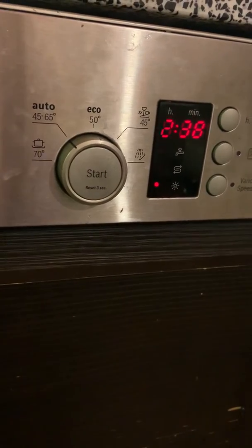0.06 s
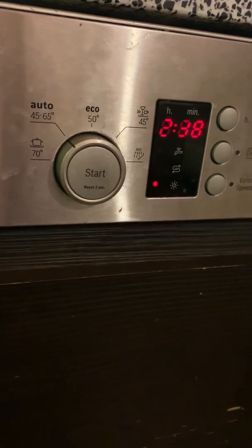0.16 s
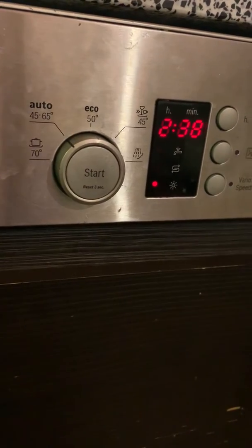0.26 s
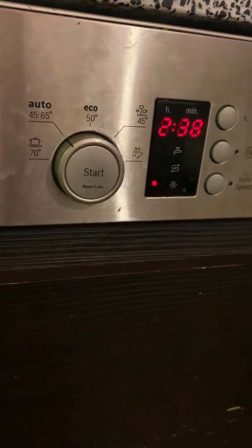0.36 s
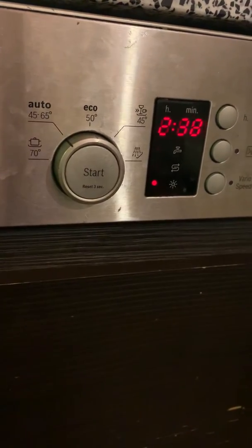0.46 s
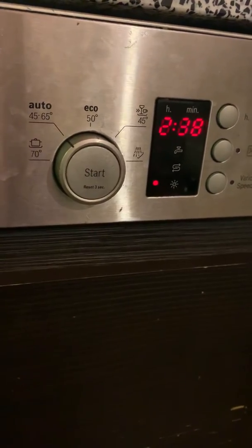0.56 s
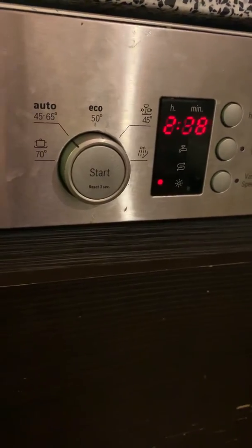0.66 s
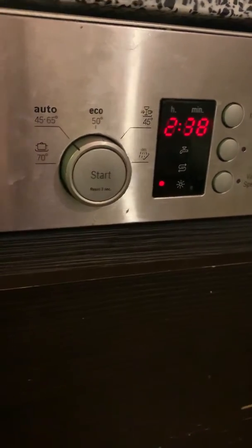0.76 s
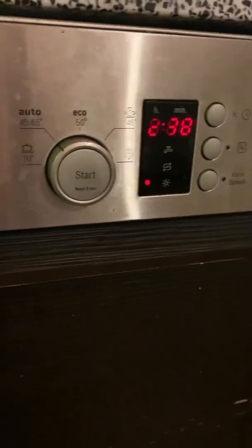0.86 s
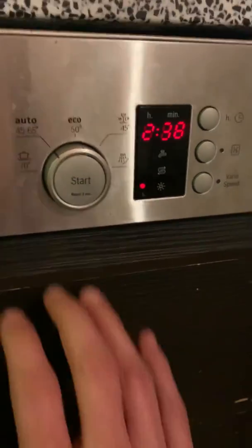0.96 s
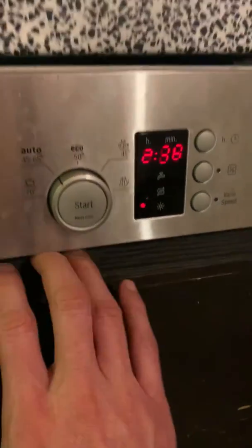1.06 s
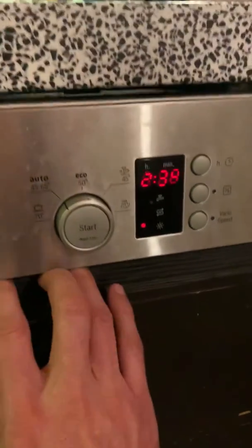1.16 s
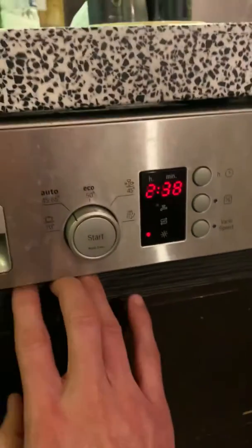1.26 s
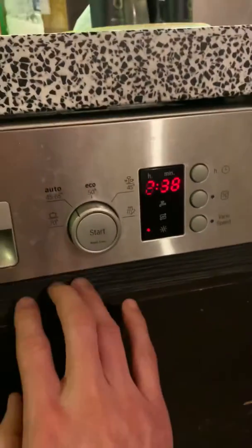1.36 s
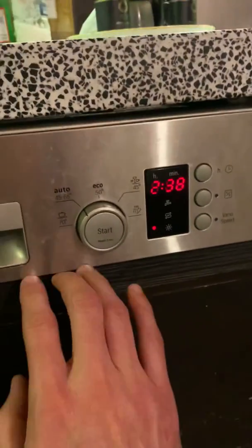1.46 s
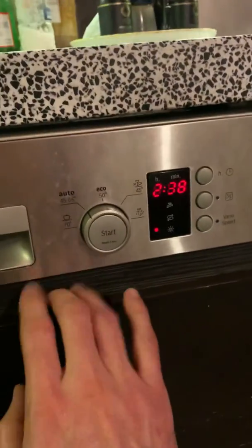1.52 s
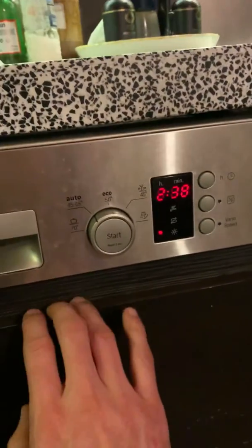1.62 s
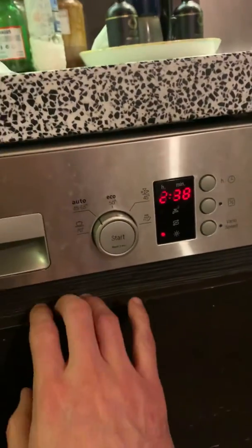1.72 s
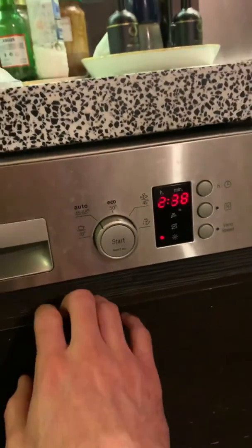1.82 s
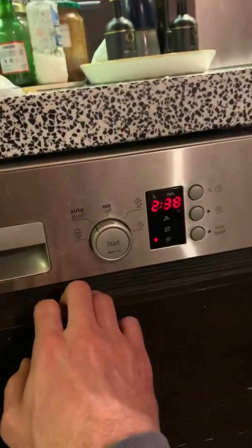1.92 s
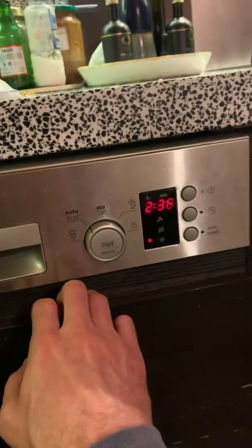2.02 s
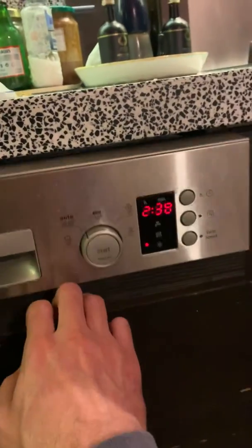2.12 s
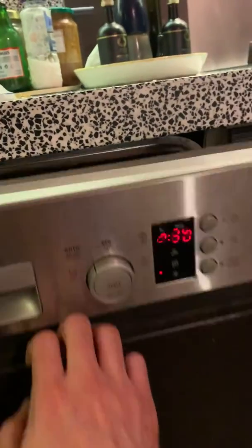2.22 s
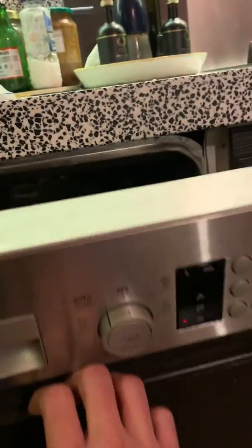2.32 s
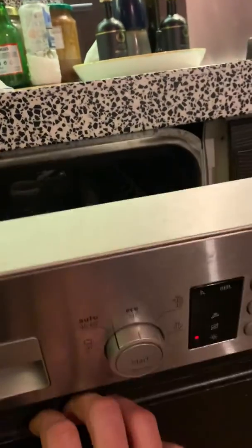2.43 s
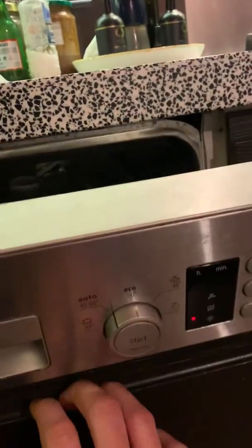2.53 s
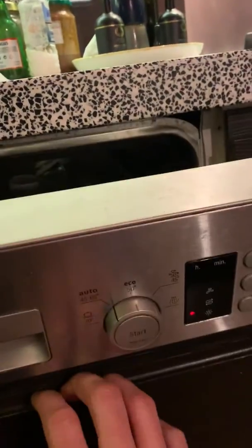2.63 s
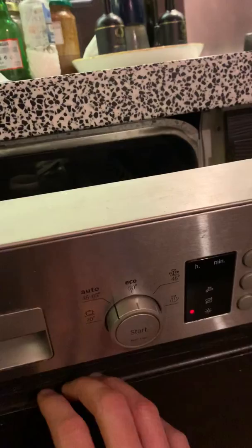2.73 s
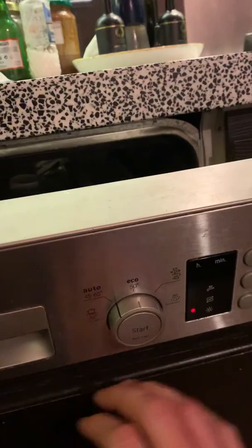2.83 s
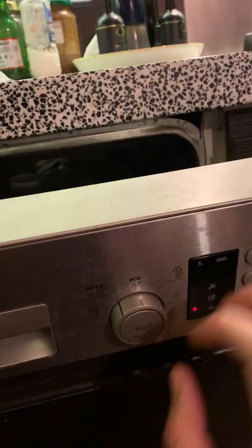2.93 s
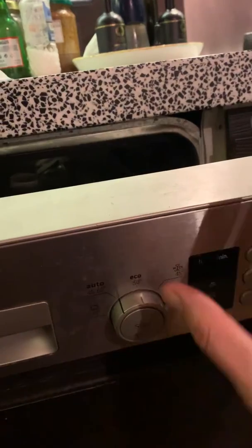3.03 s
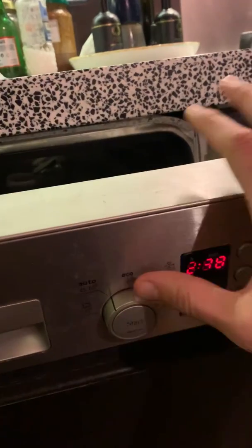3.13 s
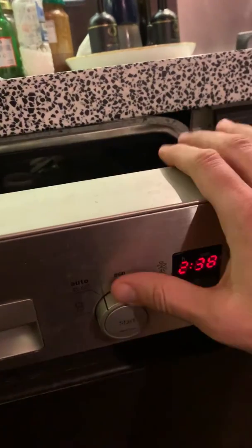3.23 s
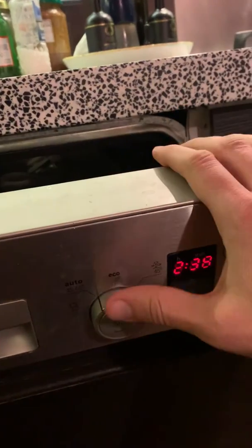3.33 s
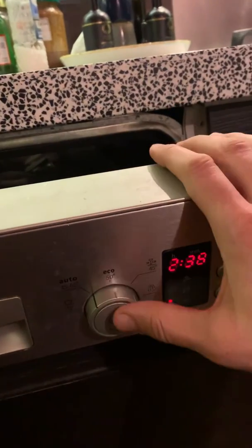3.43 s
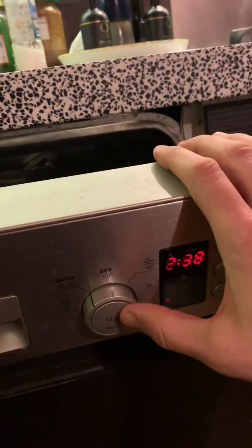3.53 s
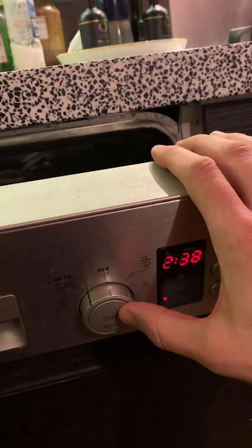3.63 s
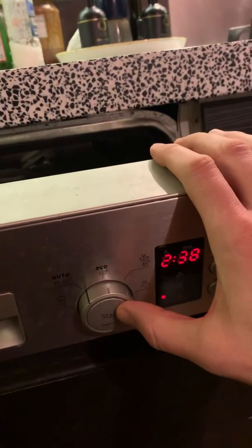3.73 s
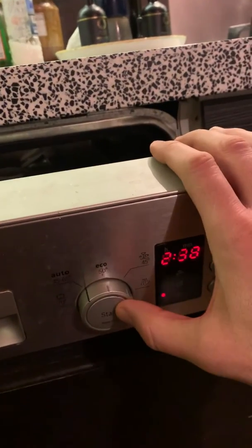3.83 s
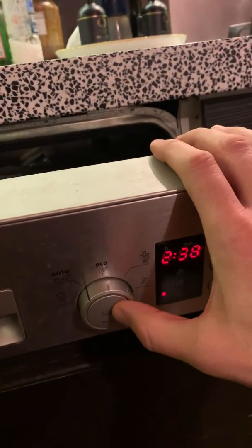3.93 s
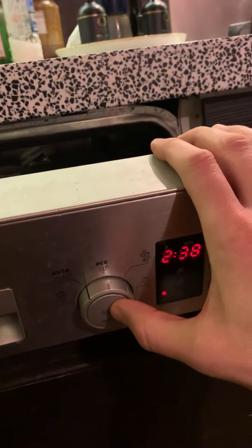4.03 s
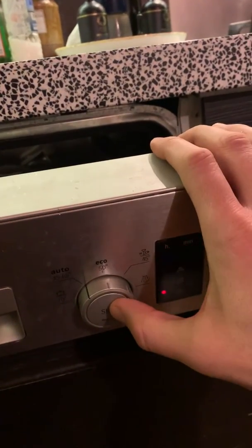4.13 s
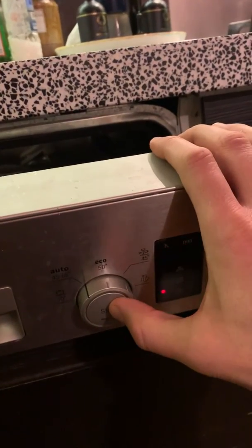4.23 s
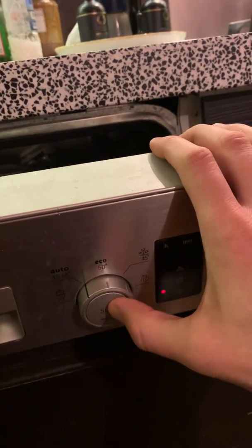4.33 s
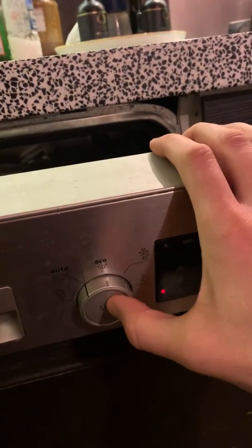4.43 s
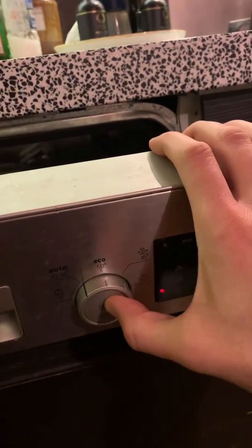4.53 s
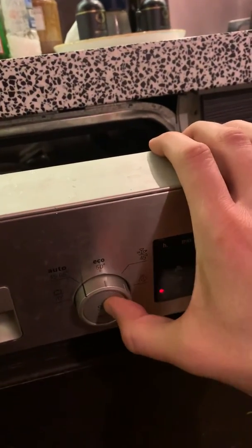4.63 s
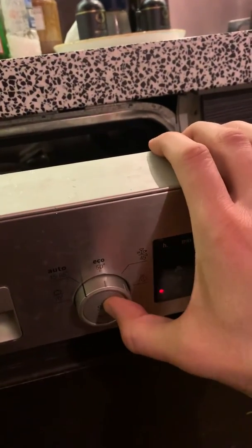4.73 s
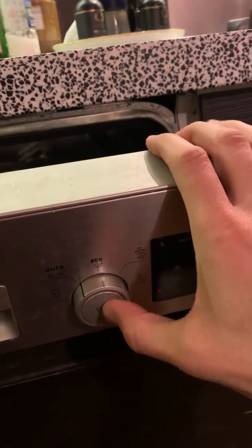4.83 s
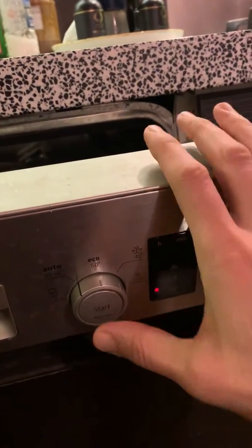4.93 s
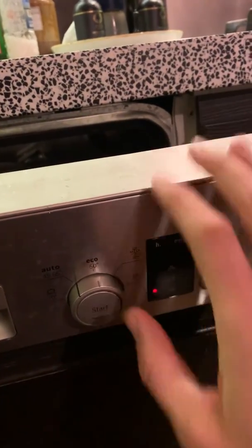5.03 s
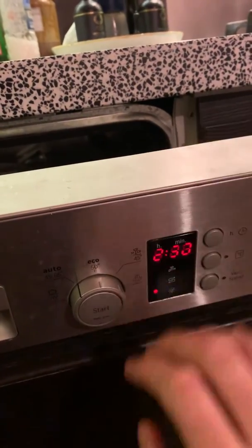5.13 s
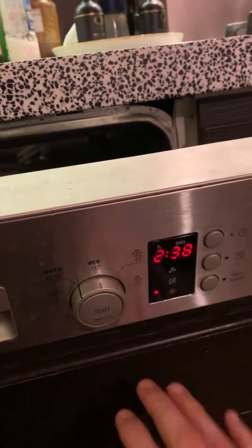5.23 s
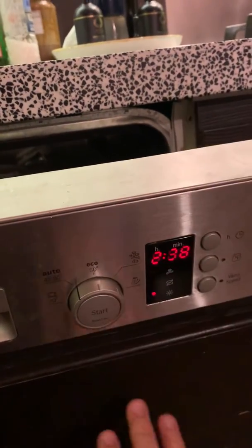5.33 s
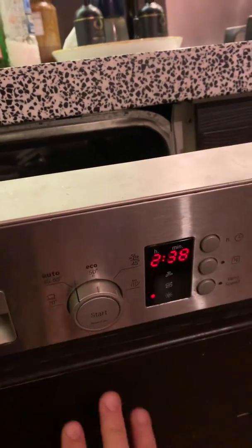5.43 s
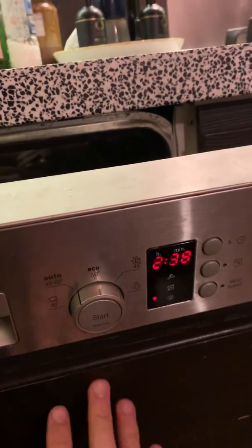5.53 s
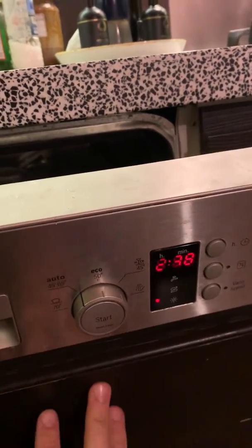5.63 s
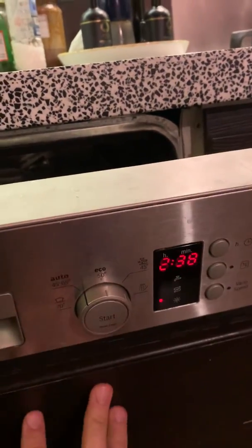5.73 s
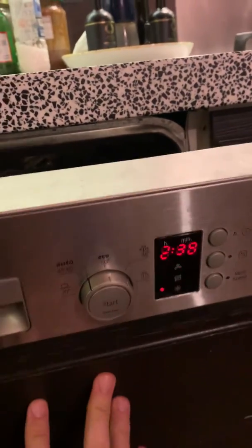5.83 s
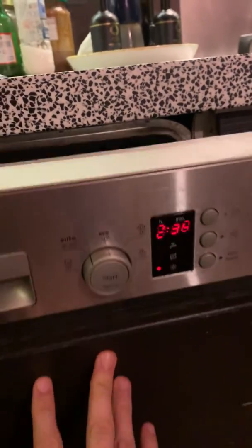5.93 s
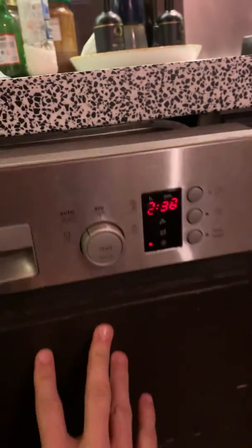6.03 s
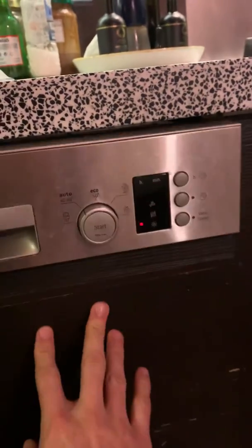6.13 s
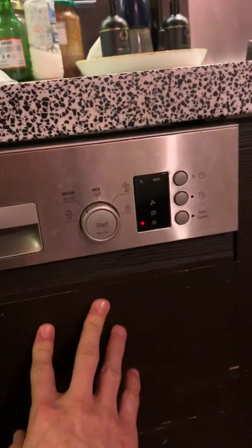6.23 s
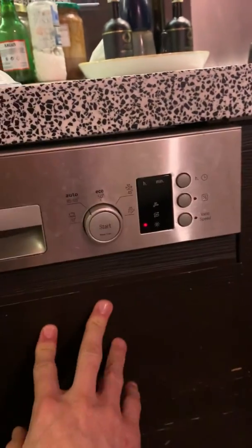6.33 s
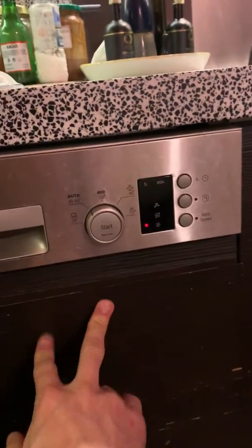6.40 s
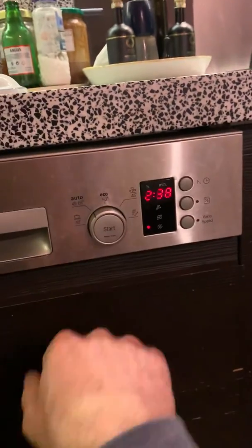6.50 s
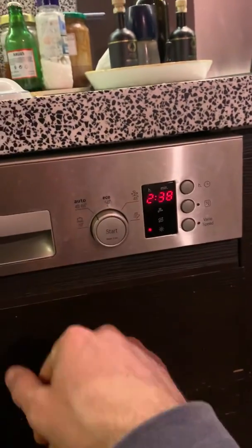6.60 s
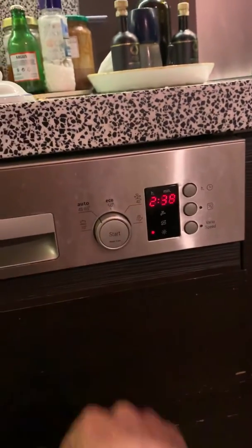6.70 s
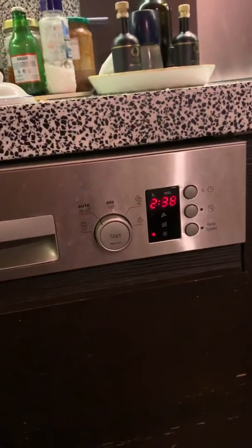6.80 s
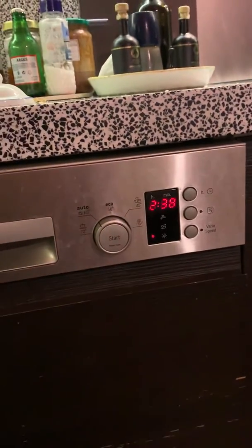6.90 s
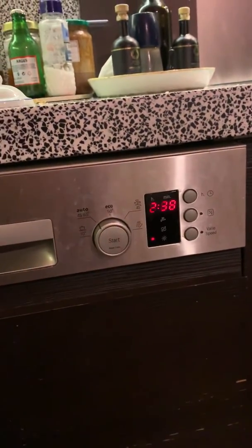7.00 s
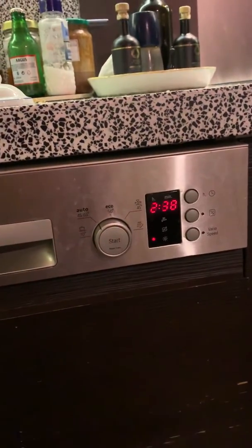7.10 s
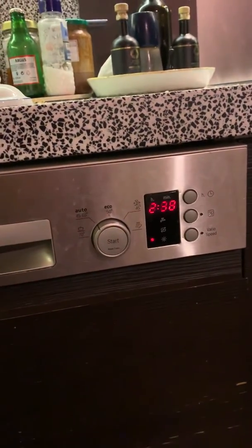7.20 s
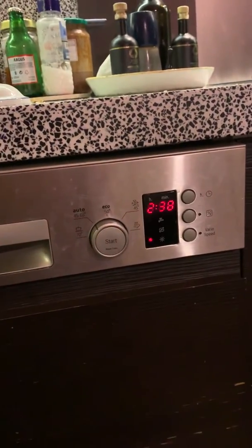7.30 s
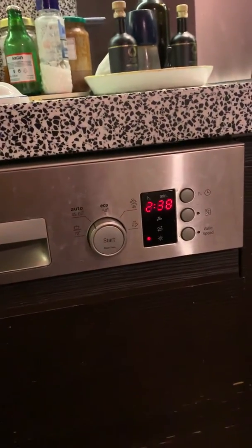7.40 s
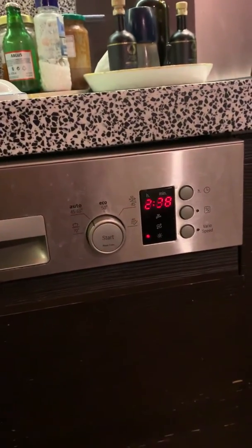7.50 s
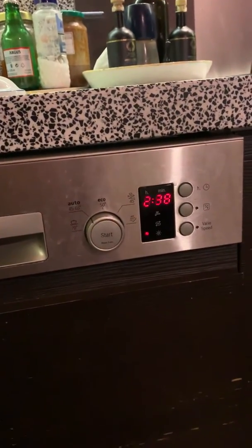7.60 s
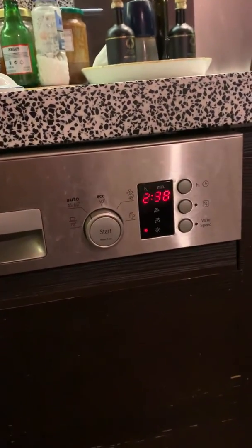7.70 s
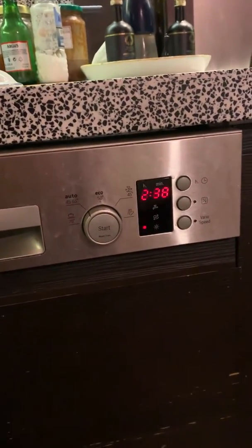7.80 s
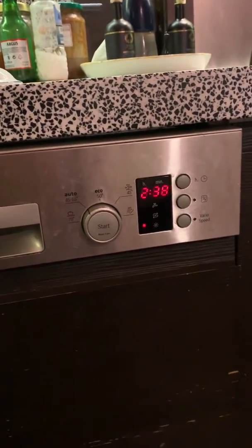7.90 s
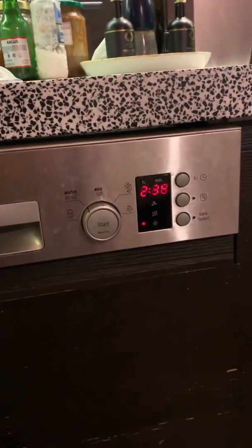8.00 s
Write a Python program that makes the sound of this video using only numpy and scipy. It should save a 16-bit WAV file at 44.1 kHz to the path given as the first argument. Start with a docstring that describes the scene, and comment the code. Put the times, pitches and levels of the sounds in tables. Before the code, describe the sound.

A low dishwasher hum cuts out, followed by latch clicks, knocks, a button press, a loud door slam and another clunk in a small kitchen.

```python
"""A dishwasher's motor hums in harmonics of its shaft speed, then stops. A hand pulls the door open (the
latch clicks, the hinge spring rings by stick-slip), presses the start knob and slams the door; a second
clunk follows and the machine rattles inside. Each impact excites damped modes: soft contacts the low
ones, hard contacts the high ones too. A small hard kitchen reverberates around a hand-held two-port
microphone, and skin and sleeve rub close by."""
import sys
import numpy as np
from scipy import signal
from scipy.fft import rfft, irfft, next_fast_len
from scipy.io import wavfile

SR = 44100
rng = np.random.default_rng(int(sys.argv[2]) if len(sys.argv) > 2 else 0)


def unload_audio(sound):
    """Save the sound as a 16-bit wav file, at the path given as the first command line argument."""
    columns = np.transpose(np.atleast_2d(sound))
    # keep every value between -1 and 1, then stretch to whole-number steps
    steps = np.round(np.clip(columns, -1, 1) * 32767)
    wavfile.write(sys.argv[1], SR, steps.astype(np.int16))


N = 355093


def from_db(db):
    """Decibels to amplitude ratio."""
    return 10 ** (np.asarray(db) / 20)


def rms_one(x):
    """Normalise to rms 1."""
    return x / np.sqrt(np.mean(x ** 2) + 1e-20)


def peak_one(x):
    """Normalise each row to peak 1."""
    return x / np.abs(x).max(axis=-1, keepdims=True)


def in_time(rows):
    """Linear interpolation of each column at every sample."""
    s, *columns = np.transpose(rows)
    return [np.interp(np.arange(N) / SR, s, c) for c in columns]


def at_hz(points, hz):
    """Interpolation on a logarithmic frequency axis."""
    known_hz, values = np.transpose(points)
    return np.interp(np.log(hz), np.log(known_hz), values)


def band(x, low_hz, high_hz, order=2):
    """Butterworth band-pass."""
    sos = signal.butter(order, [low_hz, min(high_hz, .45 * SR)], "band", fs=SR, output="sos")
    return signal.sosfilt(sos, x)


def split(x, hz):
    """Crossover: the parts below and above hz."""
    return [signal.sosfilt(signal.butter(4, hz, kind, fs=SR, output="sos"), x) for kind in ("low", "high")]


def drift(rate_hz):
    """Low-pass noise: a slow random fluctuation of rms about 1."""
    r = np.exp(-80 * np.pi * rate_hz / SR)
    slow = signal.lfilter([1], [1, -2 * r, r * r], rng.standard_normal(N // 40 + 2002))[2000:]
    return np.interp(np.arange(N) / 40, np.arange(len(slow)), rms_one(slow))


def decay(t, t60):
    """Exponential damping: 60 dB down after t60."""
    return np.exp(-np.log(1000) * t / t60)


def add(out, sound, s):
    """Superpose a short sound at time s."""
    i = round(s * SR)
    out[:, i:i + len(sound)] += sound[:N - i]


# likeness of the two ports: (frequency [Hz], correlation [ratio])
COHERENCE = [(60, 0.99), (340, .8), (700, 0.071), (1100, 0.5), (1700, 0.067), (2800, 0.1), (4800, 0.55),
             (9000, 1), (15000, 0.39)]
HALF_OCTAVES_HZ = 25 * 2 ** np.arange(0, 9.6, .5)

def at_ports(mid, side, hz, coherence_shift=0):
    """Partial coherence: two independent noises mix into a correlated left and right."""
    alike = np.clip(at_hz(COHERENCE, hz) + coherence_shift, -1, 1)
    return np.sqrt(1 + alike) * mid + np.sqrt(1 - alike) * side * [[1], [-1]]


def stereo_noise(spectrum, flicker_db, coherence_shift):
    """Random amplitude modulation: half-octave noise bands flicker, partly together; rms 1."""
    out, together = np.zeros((2, N)), drift(5.8)
    white = rng.standard_normal((2, 2, N))
    for k, (low, high) in enumerate(zip(HALF_OCTAVES_HZ, HALF_OCTAVES_HZ[1:])):
        hz = np.sqrt(low * high)
        if high < spectrum[0][0] or at_hz(spectrum, hz) < -55:
            continue
        mid, side = band(white[k % 2], low, high)
        gain = from_db(at_hz(spectrum, hz) + flicker_db * (together + drift(31)))
        out += gain * at_ports(mid, side, hz, coherence_shift)
    return rms_one(out)


# envelope of the motor: (time [s], level [dB])
MOTOR_LEVEL = [(0.0, -48.5), (0.364, -49), (0.404, -55), (0.43, -68), (0.495, -79)]
# harmonics of the hum: (order [multiple of shaft speed], relative level [dB])
MOTOR_ORDERS = [(1, -7), (2, 3), (3, -7.5), (4, -15.5), (5, -7.5), (6, -1.5), (7, -14), (8, -8), (9, -15),
                (10, -39), (11, -20), (12, -26), (13, -20), (14, -42)]
# spectral envelope of the high orders: (frequency [Hz], relative level [dB])
BUZZ_SPECTRUM = [(350, -44), (600, -9), (756, -1.5), (2150, -5.5), (3410, -17.5), (3830, -11.5),
                 (4150, -19), (5000, -28), (6500, -58), (11000, -120)]
# tones of the drive electronics: (frequency [Hz], rms level [dB])
WHINE_TONES = [(9787, -105), (10266, -99)]
TURNS_PER_S, SWITCH_OFF_S, SLOWING_TURNS_PER_S2 = 40.2, .36, 64
HUM_WAVER_DB, BUZZ_DB, BUZZ_ROUGHNESS, WHINE_END_S = 2, -28, .3, 0.35

def motor():
    """Rotation radiates harmonics of the shaft speed, which glide down together after switch-off."""
    t = np.arange(SR // 2) / SR
    lost_turns = SLOWING_TURNS_PER_S2 / 2 * np.maximum(t - SWITCH_OFF_S, 0) ** 2
    angle = 2 * np.pi * (TURNS_PER_S * t - lost_turns)
    hum = sum(from_db(db) * np.sin(k * angle + rng.uniform(0, 2 * np.pi)) for k, db in MOTOR_ORDERS)
    orders = np.arange(15, 110)
    strengths = from_db(at_hz(BUZZ_SPECTRUM, orders * TURNS_PER_S) + 3.4 * rng.standard_normal(len(orders)))
    buzz = strengths @ np.sin(orders[:, None] * angle + rng.uniform(0, 2 * np.pi, (len(orders), 1)))
    buzz *= 1 + BUZZ_ROUGHNESS * rms_one(band(rng.standard_normal(len(t)), 23, 240))  # loose parts blur it
    level_db = in_time(MOTOR_LEVEL)[0] + HUM_WAVER_DB * drift(13)
    running = from_db(level_db[:len(t)]) * (t < MOTOR_LEVEL[-1][0])
    whine = sum(np.sqrt(2) * from_db(db) * np.sin(2 * np.pi * hz * t) for hz, db in WHINE_TONES)
    out = np.zeros((2, N))
    add(out, running * (rms_one(hum) + from_db(BUZZ_DB) * rms_one(buzz)) + whine * (t < WHINE_END_S), 0)
    return out


# background of the room: (frequency [Hz], relative spectral density [dB])
ROOM_SPECTRUM = [(15, -43), (25, -7), (92, 2.5), (330, -5), (399, -9.5), (445, -13.5), (669, -31),
                 (1010, -19), (1390, -31), (1640, -32.5), (5270, -31), (9080, -29.5), (16500, -34.5)]
# slow changes of its treble: (time [s], gain [dB])
HISS_GAIN = [(0, 3), (0.45, -6.5), (1.4, 1.5), (2.1, 2), (5.5, 2), (8.05, 4)]
ROOM_DB, HISS_FROM_HZ = -74, 950

def room_noise():
    """Broadband ambient noise: a steady low murmur under a faint hiss."""
    murmur, hiss = split(stereo_noise(ROOM_SPECTRUM, flicker_db=.6, coherence_shift=-.4), HISS_FROM_HZ)
    return from_db(ROOM_DB) * (murmur + from_db(in_time(HISS_GAIN)[0]) * hiss)


# the door in motion: (time [s], rumble level [dB], creak level [dB])
DOOR_MOTION = [(0.45, -65.5, -102), (0.85, -79, -92.5), (1.76, -56.5, -78), (2.08, -61, -50.5),
               (2.48, -60.5, -69.5), (2.65, -45.5, -61), (2.9, -63.5, -60), (4.7, -59, -71.5),
               (5.42, -68.5, -74), (5.99, -60, -54), (6.27, -53.5, -48), (6.4, -43, -45),
               (6.69, -57.5, -68.5), (6.97, -51, -76.5), (7.12, -49, -57.5), (7.31, -59.5, -71.5),
               (7.62, -60, -62), (8.05, -60.5, -72)]
# its two noises: (frequency [Hz], relative spectral density [dB])
RUMBLE_SPECTRUM = [(15, -43), (25, -17), (70, -3), (107, -7), (134, -12.5), (205, -13), (284, -29),
                   (500, -40), (650, -55), (1100, -120)]
CREAK_SPECTRUM = [(150, -33), (250, 9.5), (640, -5), (782, -6.5), (1310, -11), (2480, -19), (3430, -33.5),
                  (5000, -32.5), (6500, -60.5), (11000, -120)]
RUMBLE_RE_THUMP_DB, CREAK_RE_CLICK_DB = -24, -28.5

def door_motion():
    """Structure-borne noise: the door rumbles and creaks as it is moved and after each blow."""
    rumble_db, creak_db = in_time(DOOR_MOTION)
    thump_db, click_db = np.array(BLOWS)[:, 1:3].T
    fade_in = np.clip(np.arange(N) / SR / DOOR_MOTION[0][0], 0, 1) ** 20
    rumble_gain = fade_in * from_db(rumble_db) + shudder(thump_db + RUMBLE_RE_THUMP_DB)
    creak_gain = fade_in * from_db(creak_db) + shudder(click_db + CREAK_RE_CLICK_DB)
    rumble = stereo_noise(RUMBLE_SPECTRUM, flicker_db=4.0, coherence_shift=0.029)
    creak = stereo_noise(CREAK_SPECTRUM, flicker_db=3.0, coherence_shift=0.054)
    return rumble_gain * rumble + creak_gain * creak


# strokes of skin and sleeve, and a last soft hiss from the tub at 7.7 s: (start [s], level [dB], hold [s], rise
# [s], gain of the dull part [dB])
RUBS = [(0.567, -91, 0.032, 0.034, 5), (0.75, -89, 0.027, 0.02, -9), (0.863, -88, 0.02, 0.017, -1),
        (1.02, -77, 0.067, 0.029, 6), (1.244, -75, 0.067, 0.028, -1), (1.555, -72, 0.015, 0.0087, -12),
        (1.616, -64.5, 0.035, 0.038, -3), (1.915, -79, 0.034, 0.026, 10), (2.37, -61.5, 0.0082, 0.013, -7),
        (2.488, -78, 0.019, 0.018, 14), (2.663, -64, 0.057, 0.015, 4.5), (2.718, -53, 0.058, 0.017, -25),
        (2.799, -74, 0.016, 0.024, -2), (3.034, -70.5, 0.017, 0.015, 12), (3.106, -58.5, 0.012, 0.018, 0),
        (3.126, -78.5, 0.051, 0.043, 9), (3.288, -65, 0.13, 0.11, -3), (3.552, -62.5, 0.012, .015, 7.5),
        (3.811, -82, 0.035, 0.016, 14.5), (4.376, -66, 0.011, 0.012, -3), (4.39, -78, 0.043, 0.036, 16),
        (4.743, -67.5, 0.033, 0.047, 13), (6.432, -63.5, 0.018, 0.024, 12.5), (6.616, -77, .03, 0.025, 6),
        (6.931, -65.5, 0.075, 0.043, -2), (7.469, -68.5, 0.02, .02, -3), (7.696, -81, 0.17, 0.15, 2)]
# their friction noise: (frequency [Hz], relative spectral density [dB])
RUB_SPECTRUM = [(1200, -33), (2000, 9), (4000, -8.5), (5500, -5), (7400, 3), (9000, -4.5), (11000, -6),
                (15500, -3), (17000, -10)]
DULL_BELOW_HZ = 5100

def rubs():
    """Sliding friction makes noise that rises, holds, and fades in twice its rise time."""
    t = np.arange(N) / SR
    strokes = np.array([from_db(db) * np.interp(t, np.cumsum((s, rise, hold, 2 * rise)), (0, 1, 1, 0)) ** 2
                        for s, db, hold, rise, _ in RUBS])
    dull, bright = split(stereo_noise(RUB_SPECTRUM, flicker_db=3.0, coherence_shift=0.073), DULL_BELOW_HZ)
    dull_gains = from_db(np.array(RUBS)[:, 4])
    return dull_gains @ strokes * dull + strokes.sum(axis=0) * bright


def contact_force(length_s, per_s):
    """Rough contact: one blow or slide is a train of small random impulses."""
    t = np.arange(2400) / SR
    hits = (rng.random(len(t)) < per_s / SR) * rng.standard_normal(len(t))
    hits[0] = 0.21 + 2.93 * np.exp(-length_s / 0.0079)  # long contacts start softly
    progress = t / max(length_s, .0005)
    return hits * np.where(progress < 1, .5 + 2 * progress * (1 - progress), 0)


def struck(modes, t, spread_db, count):
    """Modal superposition: one row of damped sines a strike, with random strengths and signs."""
    hz, level_db, t60 = np.transpose(modes)[:, :, None]
    chance = rng.standard_normal((count, 2, len(modes)))
    strengths = from_db(level_db.T + spread_db * chance[:, 0]) * np.sign(chance[:, 1])
    return strengths @ (np.sin(2 * np.pi * hz * t) * decay(t, t60))


# the door's boom, panel, clack, latch and tick: middle frequency, and how readily each rings
PART_HZ, PART_DB = np.array([200, 550, 1500, 3300, 8000]), (-1.5, 2.5, 2, -0.5, 2)
THUMP_DB_PER_OCT, CLICK_BELOW_DB_PER_OCT, CLICK_ABOVE_DB_PER_OCT = 9, 6, 15

def part_gains(thump_db, click_db, click_octaves):
    """Excitation spectrum: the thump falls off above the boom, the click on both sides of its pitch."""
    octaves = np.log2(PART_HZ / 1000)
    offset = octaves - click_octaves[:, None]
    click_loss_db = np.where(offset > 0, CLICK_ABOVE_DB_PER_OCT, CLICK_BELOW_DB_PER_OCT) * np.abs(offset)
    thump = from_db(thump_db[:, None] - THUMP_DB_PER_OCT * (octaves - octaves[0]))
    click = from_db(click_db[:, None] - click_loss_db)
    return from_db(PART_DB) * np.hypot(thump, click)


# knocks and clicks: (time [s], thump level [dB], click level [dB], click pitch [octaves above 1 kHz],
# contact time [s], reverberation send [dB])
BLOWS = [(0.916, -80, -58.5, -2, 0.0018, -15), (1.045, -47.5, -58, 1.3, 0.017, 0),
         (1.229, -80, -57, 4, 0.0016, -14), (1.238, -56.5, -59, 1, 0.011, -2),
         (1.419, -66, -57, 1.4, 0.002, 2), (1.46, -46, -51.5, 2.5, 0.0023, -8),
         (1.522, -39.5, -51, 3, 0.0044, -26), (1.552, -68, -56, 3.5, 0.003, -2),
         (1.732, -47, -45.5, 2.5, 0.008, -3.5), (1.774, -43, -28.5, 7, 0.0044, -10),
         (1.825, -33.5, -35.5, 0, 0.0028, -15.5), (1.832, -48, -38.5, 3, 0.0025, -8.5),
         (1.956, -74, -57, 1.5, .003, -9), (1.968, -54, -52, 2, .0022, 3.5),
         (1.996, -60, -52, 3.5, .002, -16), (2.011, -46, -45.5, 1.8, 0.0026, -30),
         (2.029, -54, -54, 1.5, 0.0017, -14), (2.066, -47, -51, 1.5, 0.0083, -3),
         (2.092, -28.5, -31.5, 2.5, 0.0047, -3), (2.381, -69, -47.5, 3, 0.004, -14),
         (2.395, -65, -52, 3, 0.002, -16), (2.476, -50.5, -57.5, 2, 0.0012, 8.5),
         (2.524, -46, -49.5, 1.15, 0.028, -6.5), (2.676, -45, -39, 4.5, 0.001, -23),
         (2.73, -55, -38, 3, .001, -20), (2.757, -55, -42, 4, 0.019, -7),
         (3.051, -48.5, -53, 1.2, 0.022, 6), (3.117, -58, -39, 3.5, 0.0022, -7),
         (3.24, -75, -59, 1.5, 0.024, -12), (3.45, -41, -58, 1, 0.02, -7.5),
         (3.562, -58, -42.5, 3, 0.005, -11), (3.703, -49.5, -52, 1, 0.038, -4.5),
         (3.851, -50, -57, 1, 0.038, -1), (3.99, -53, -56, 0.5, 0.025, -23),
         (4.324, -61, -59, 0, 0.0097, -2), (4.361, -50.5, -45, 0.44, 0.003, -3.5),
         (4.386, -44, -50, 5, 0.027, -14), (4.412, -47, -45.5, .6, 0.0016, -11),
         (4.422, -48, -39.5, 0.5, 0.0048, -17), (4.438, -39, -38.5, 2.5, 0.003, -17),
         (4.444, -42.5, -42, 1, 0.005, -22), (4.722, -85, -51.5, 3, 0.0024, -9),
         (4.745, -77, -73, -1, .003, -5), (4.771, -48, -33.5, 4.5, 0.001, -5),
         (4.789, -41.5, -32.5, 2.5, 0.005, -16), (4.816, -33, -31.5, 1.1, 0.002, -7.5),
         (4.912, -45.5, -44.5, 1.54, .0017, -26), (4.951, -65, -44.5, 1.3, 0.0029, -39),
         (4.984, -70, -56, -0.5, 0.0049, -20.5), (5.534, -45, -51, -11, 0.016, 0.5),
         (5.725, -90, -53, 2, 0.0036, -8), (5.893, -68, -56, 1.5, 0.00094, 2),
         (5.911, -46, -37.5, 2, 0.0022, -11), (6.059, -37, -39.5, 4.5, 0.003, 9.5),
         (6.081, -24, -26, 0.25, 0.005, 2), (6.128, -43, -29.5, 0.6, 0.014, 6),
         (6.143, -18, -14.5, 1.86, 0.005, -7.5), (6.149, -17.5, -6, 3, .002, -7),
         (6.152, -12.5, -6.5, 2.27, 0.0016, -4.5), (6.158, -19.5, -15.5, 0.8, 0.0022, -4.5),
         (6.163, -22.5, -17, 2.7, 0.004, -4), (6.478, -63.5, -45.5, 3, .001, -12.5),
         (6.465, -38.5, -41, 1.06, 0.021, -4), (6.637, -48, -42.5, 4, .0046, -11),
         (6.925, -48, -63.5, 2.5, 0.0018, -10), (6.939, -49, -49, 1.5, 0.024, 1),
         (6.961, -46, -36, 3, 0.004, -10.5), (6.966, -33, -17.5, 0.6, 0.00116, -5),
         (6.985, -37.5, -32, 0.9, .003, -10.5), (6.996, -40, -30.5, -0.3, .003, -6),
         (7.022, -49, -37, -1, .003, -7.5), (7.152, -39.5, -49.5, 2, .0017, -10)]
# modes of the door's five parts: (frequency [Hz], relative level [dB], t60 [s])
BOOM_MODES = [(151.6, -2, 0.17), (236.8, -9, 0.075), (262.3, 0.5, 0.089)]
PANEL_MODES = [(323.8, 2, 0.09), (414, 3.5, 0.15), (510, -2, 0.12), (670, -5.5, 0.044), (770, -11, 0.08),
               (906, -2.5, 0.077)]
CLACK_MODES = [(1044.6, -1.5, 0.045), (1300, -1.5, 0.034), (1420, -4.5, 0.059), (1495, -2.5, .045),
               (1752, 1.5, 0.043), (2100, -9.5, 0.018)]
LATCH_MODES = [(2804, 2.5, .022), (2715, 0.5, 0.041), (3280, -1.5, .025), (3596, -5, 0.025),
               (3940, -1, 0.053), (4400, 0.5, 0.068)]
TICK_MODES = [(6800, 0, .006), (8200, -2, .005), (10000, 0, .005), (11300, -3, .004), (14500, -8, .004)]
# each part's unresolved modes, as decaying noise, and its snap of first contact:
# (low edge [Hz], high edge [Hz], level [dB], t60 [s], snap level [dB])
DENSE_MODES = [(120, 300, -12, .08, -5), (300, 1000, -6, .07, 0), (1000, 2200, -4, .035, 2),
               (2200, 5000, 1, .02, 4), (5000, 13000, 2, .011, 5)]

def blows():
    """Impact: contact force convolved with each part's impulse response; gives direct sound and send."""
    t, rows = np.arange(SR // 6) / SR, np.array(BLOWS)
    forces = np.array([contact_force(contact_s, per_s=800) for contact_s in rows[:, 4]])
    gains = part_gains(*rows[:, 1:4].T)
    sounds, pulses = 0, 0
    for k, modes in enumerate((BOOM_MODES, PANEL_MODES, CLACK_MODES, LATCH_MODES, TICK_MODES)):
        low_hz, high_hz, dense_db, t60, snap_db = DENSE_MODES[k]
        rings = struck(modes, t, spread_db=2.0, count=len(rows))
        dense = band(rng.standard_normal((len(rows), len(t))) * decay(t, t60), low_hz, high_hz, order=3)
        snap = band(1.0 * (t == 0), low_hz, high_hz)
        response = peak_one(rings) + from_db(dense_db) * peak_one(dense) + from_db(snap_db) * peak_one(snap)
        driven = signal.fftconvolve(response, forces, axes=1)[:, :len(t)]
        part = gains[:, k, None] * peak_one(band(driven, .7 * low_hz, 1.3 * high_hz))
        sounds += part
        # over all directions the modes even out: the walls get a smooth pulse of the same energy
        pulses += snap * np.sqrt(np.sum(part ** 2, axis=1, keepdims=True) / np.sum(snap ** 2))
    direct, send = np.zeros((2, N)), np.zeros((2, N))
    for sound, pulse, (s, *_, send_db) in zip(sounds, pulses, BLOWS):
        add(direct, sound, s)
        add(send, from_db(send_db) * pulse, s)
    return direct, send


def shudder(levels_db, rise_s=0.011, t60=0.71):
    """Energy summation: an envelope that swells after every blow and dies away."""
    t, energy = np.arange(SR) / SR, np.zeros(N)
    energy[(np.array(BLOWS)[:, 0] * SR).astype(int)] = from_db(levels_db) ** 2
    swell = (1 - np.exp(-t / rise_s)) * decay(t, t60)
    return np.sqrt(np.abs(signal.fftconvolve(energy, swell ** 2)[:N]))


JANGLE_PER_S, JANGLE_RE_CLICK_DB = 900, -38

def jangle():
    """Secondary impacts: racks and crockery jangle after a blow, each contact ringing one mode."""
    modes = CLACK_MODES + LATCH_MODES
    hits = (rng.random(N) < JANGLE_PER_S / SR) * rng.standard_normal(N)
    mode_hit = rng.integers(0, len(modes), N)
    out = 0
    for k, (hz, db, t60) in enumerate(modes):
        r, w = decay(1 / SR, t60), 2 * np.pi * hz / SR
        force = hits * (mode_hit == k) + 1e-18
        out += from_db(db) * signal.lfilter([0, np.sin(w)], [1, -2 * r * np.cos(w), r * r], force)
    return rms_one(out) * shudder(np.array(BLOWS)[:, 2] + JANGLE_RE_CLICK_DB)


# hollow bumps on the panel: (time [s], peak level [dB], push time [s])
BUMPS = [(0.938, -60, 0.01), (2.092, -32.5, 0.0033), (2.794, -45.5, 0.022), (2.821, -34.5, 0.0077),
         (3.02, -39, 0.035), (3.034, -34, 0.046), (3.075, -42, 0.036), (6.149, -19, 0.0042)]
BUMP_BAND_HZ = (462, 786)

def bumps():
    """Band-limited excitation: a soft, uneven push rings the panel's modes without a click."""
    out, t = np.zeros((2, N)), np.arange(SR // 4) / SR
    for s, peak_db, push_s in BUMPS:
        rings = struck(PANEL_MODES, t, spread_db=1.0, count=1)[0] * decay(t, 0.082)
        hollow = peak_one(rings) + 0.57 * rng.standard_normal(len(t)) * decay(t, 0.15)
        pushed = signal.fftconvolve(hollow, contact_force(push_s, per_s=700))[:len(t)]
        add(out, from_db(peak_db) * peak_one(band(pushed, *BUMP_BAND_HZ, order=3)), s)
    return out


# small parts that ring when touched: (time [s], level [dB], frequency [Hz], t60 [s])
PINGS = [(1.054, -63, 1700, 0.072), (1.239, -65, 1520, 0.068), (1.42, -60, 1500, .012),
         (1.461, -48, 1270, 0.027), (1.523, -49.5, 1250, 0.023), (1.46, -59, 3970, .005),
         (1.524, -52, 4200, .006), (1.524, -50, 6700, 0.011), (1.528, -41, 245, 0.12),
         (1.784, -60, 8500, 0.007), (1.826, -47, 900, .012), (1.776, -49, 298, .08),
         (1.826, -39, 301, 0.076), (1.833, -48, 4350, .006), (1.956, -58, 1560, .05),
         (2.095, -30, 425, 0.044), (2.243, -35, 4600, 0.038), (2.381, -61, 7200, 0.014),
         (2.525, -58, 1796, 0.11), (2.525, -60, 2650, 0.17), (2.729, -46, 2550, 0.0046),
         (2.73, -46, 4400, 0.0045), (2.822, -39, 486, .06), (2.822, -44.5, 728, 0.24),
         (3.04, -54, 810, 0.17), (3.245, -60, 1650, .06), (3.245, -65, 2980, .05), (3.448, -61, 1650, .06),
         (3.563, -50, 2590, 0.06), (3.706, -56, 2560, 0.075), (3.705, -60, 3100, .07),
         (3.706, -64, 1900, 0.054), (3.83, -74, 7020, .15), (3.118, -49, 7000, 0.044),
         (3.118, -51, 9200, 0.022), (3.12, -52, 2600, 0.038), (4.361, -46, 1500, .012),
         (4.423, -42, 1700, .02), (4.386, -62, 8300, 0.0073), (4.393, -58, 8800, .01),
         (4.437, -36.5, 7300, 0.0048), (4.437, -36, 2100, .005), (4.771, -36.5, 6600, 0.0069),
         (4.771, -39, 4500, 0.0066), (4.783, -48, 3000, 0.0065), (4.789, -29.5, 6350, 0.012),
         (4.789, -32, 7400, 0.013), (4.789, -28, 1800, 0.0042), (4.789, -48, 4500, .004),
         (4.817, -41, 8200, .007), (4.818, -33, 1600, 0.0086), (4.819, -35.5, 4350, 0.012),
         (4.819, -32.5, 930, 0.025), (4.82, -45, 401, 0.26), (4.919, -53.5, 1314, 0.1),
         (4.952, -53, 1287, 0.076), (4.985, -61.5, 1308, 0.071), (5.911, -46, 2000, 0.011),
         (6.059, -42, 1656, 0.094), (6.082, -31, 952, 0.084), (6.149, -18, 414, 0.073),
         (6.15, -17.5, 510, 0.042), (6.15, -26.5, 670, 0.16), (6.151, -19.5, 1495, 0.036),
         (6.15, -21, 1752, 0.05), (6.151, -25, 916, 0.065), (6.151, -25, 1066, .06),
         (6.15, -15, 3406, 0.056), (6.149, -8.5, 10740, 0.0097), (6.155, -18.5, 262, 0.11),
         (6.967, -33.5, 1400, 0.11), (6.968, -32.5, 1250, 0.086), (6.968, -34, 1830, .07),
         (6.966, -23.5, 990, 0.045), (6.966, -27.5, 2800, 0.02), (6.966, -39.5, 820, 0.18)]
PING_RISE_CYCLES = .3

def pings():
    """Damped free vibration: a short touch sets a single mode ringing."""
    out, t = np.zeros((2, N)), np.arange(SR // 5) / SR
    for s, db, hz, t60 in PINGS:
        envelope = (1 - np.exp(-t * hz / PING_RISE_CYCLES)) * decay(t, t60)
        add(out, from_db(db) * envelope * np.sin(2 * np.pi * hz * t), s)
    return out


# soft pushes on the whole door: (time [s], peak level [dB], frequency [Hz], t60 [s])
THUDS = [(1.057, -40.5, 67.7, 0.33), (1.52, -50.5, 118.6, 0.41), (1.814, -54, 92, .38),
         (2.096, -29.5, 64.2, 0.21), (2.11, -41.5, 150.6, 0.35), (2.499, -45, 54.3, 0.45),
         (2.621, -44, 110.1, 1), (3.065, -48, 77, 0.28), (3.493, -35.5, 67.3, 0.26),
         (4.823, -44.5, 75, 0.43), (5.549, -51, 50, 0.35), (6.146, -22.5, 83.3, 0.27),
         (6.164, -28.5, 50.7, 0.24), (6.17, -28, 151.5, 0.38), (6.562, -46, 46.2, 0.44),
         (6.472, -40, 71.3, 1), (6.796, -56, 74, 0.4), (6.916, -45, 119, 0.25), (6.969, -29.5, 105.6, 0.36),
         (6.972, -32.5, 156, 0.24), (6.975, -35.5, 56.3, 0.35), (7.147, -40, 63.1, 0.48),
         (7.5, -53, 149.2, .6)]
PUSH_RISE_S = 0.0129

def thuds():
    """Flexural vibration: a soft push bends the door skin in one low mode."""
    out, t = np.zeros((2, N)), np.arange(SR // 2) / SR
    for s, peak_db, hz, t60 in THUDS:
        envelope = peak_one((1 - np.exp(-t / PUSH_RISE_S)) * decay(t, t60))
        add(out, from_db(peak_db) * envelope * np.sin(2 * np.pi * hz * t), s - PUSH_RISE_S)
    return out


# slides of the hinge spring: (time [s], level [dB], slide time [s])
SPRING_SLIDES = [(2.15, -48, 0.088), (2.186, -40, 0.055), (2.242, -34, 0.052), (6.079, -40, 0.12)]
# its modes: (frequency [Hz], relative level [dB], t60 [s])
SPRING_MODES = [(1410, -2, .05), (2395, 0, .04), (3380, -3, .04), (4606, 2, .05), (6100, -1, .06),
                (6830, -1, .07), (7480, -3, .06), (7750, -5, .06), (8500, -3, .07), (9464, -3, .07),
                (10050, -5, .06), (10900, -10, .06), (11500, -10, .06)]

def hinge_spring():
    """Stick-slip friction: many small slips scrape the spring and keep its modes ringing."""
    out, t = np.zeros((2, N)), np.arange(SR // 4) / SR
    for s, db, slide_s in SPRING_SLIDES:
        slips = contact_force(slide_s, per_s=2000)
        slips *= decay(t[:len(slips)], 3.3 * slide_s)
        slips[0] = 3.4  # the opening pluck
        scrape = band(rng.standard_normal(len(t)), 470, 5200) * decay(t, 0.29)
        response = struck(SPRING_MODES, t, spread_db=2.5, count=1)[0]
        rings = signal.fftconvolve(response, slips)[:len(t)]
        add(out, from_db(db) * (peak_one(rings) + 0.66 * scrape), s)
    return out


# spurts of the rattle: (time [s], low ring level [dB], tinkle level [dB], hold [s])
SPURTS = [(7.178, -57.5, -43.5, 0.015), (7.19, -43, -62, 0.018), (7.218, -54, -76, 0.079),
          (7.438, -73, -57.5, 0.0092), (7.481, -52.5, -53, 0.022), (7.509, -54, -63, .04),
          (7.552, -54, -57, 0.027), (7.61, -58.5, -64, 0.069), (7.705, -57, -63.5, 0.065),
          (7.78, -59, -59, 0.074), (7.859, -70.5, -63.5, 0.082), (7.955, -73.5, -68, .08)]

def spurts(t, rise_s=0.0012, t60=0.12):
    """Incoherent addition: overlapping spurts sum in power; gives the gains of low ring and tinkle."""
    shapes = [np.clip((t - s) / rise_s, 0, 1) * decay(np.maximum(t - s - hold, 0), t60)
              for s, *_, hold in SPURTS]
    powers = from_db(np.array(SPURTS)[:, 1:3].T) ** 2
    return np.sqrt(powers @ np.square(shapes))


# resonances of racks and tub walls: (frequency [Hz], bandwidth [Hz], relative spectral density [dB])
TUB_RESONANCES = [(150.1, 13.8, 5), (428.2, 22, 4), (532, 21, -8.5), (712, 24.6, -9.5), (840, 27, -12.5),
                  (1048, 34, -13), (1627, 25, -16), (1700, 25, -20.5), (1865, 37, -23), (2108, 39, -18.5),
                  (2350, 42, -30), (3100, 60, -26), (3293, 46, -17), (3466, 35, -26.5), (3760, 63, -20.5),
                  (3905, 53, -17), (4060, 28, -13), (4220, 29, -25), (4500, 34, -25.5)]
RATTLE_PER_S, TINKLE_FROM_HZ, DRONE_HZ, DRONE_GAIN = 280, 1200, 427, 1.23

def rattle():
    """Randomly driven resonators: small contacts ring the shut tub, with a wavering tone among them."""
    start = round(SPURTS[0][0] * SR)
    size = N - start
    low, tinkle = np.zeros((2, size)), np.zeros((2, size))
    for hz, width, db in TUB_RESONANCES:
        contacts = (rng.random(size) < RATTLE_PER_S / SR) * rng.laplace(size=size)
        force = contacts + 0.069 * rng.standard_normal((2, size))
        r = np.exp(-np.pi * width / SR)
        rings = signal.lfilter([1, 0, -1], [1, -2 * r * np.cos(2 * np.pi * hz / SR), r * r], force)
        register = low if hz < TINKLE_FROM_HZ else tinkle
        register += from_db(db) * np.sqrt(width) * rms_one(rings)
    splash = band(rng.standard_normal((2, size)), 2270, 2820)  # fills in between the resonances
    tinkle = (rms_one(tinkle) + 0.22 * rms_one(splash)) * from_db(2.7 * drift(23)[start:])
    waver = from_db(drift(28)[start:])
    drone_hz = DRONE_HZ + 4.45 * drift(6.56)[start:]
    drone = waver * np.sin(2 * np.pi * np.cumsum(drone_hz) / SR)
    low_gain, tinkle_gain = spurts(np.arange(start, N) / SR)
    out = np.zeros((2, N))
    out[:, start:] = low_gain * (rms_one(low) + DRONE_GAIN * drone) + tinkle_gain * rms_one(tinkle)
    return out


# reverberation time of the kitchen: (frequency [Hz], t60 [s])
KITCHEN_T60 = [(60, 0.56), (250, 0.3), (1000, 0.62), (2500, 0.49), (4000, 0.58), (7000, 0.46),
               (10000, 0.49), (15000, 0.053)]

def kitchen(x):
    """Diffuse reverberation: convolution with noise that decays at its own rate in each band."""
    t, tail = np.arange(SR) / SR, 0
    white = rng.standard_normal((2, 2, SR))
    for k, (low, high) in enumerate(zip(HALF_OCTAVES_HZ, HALF_OCTAVES_HZ[1:])):
        hz = np.sqrt(low * high)
        mid, side = band(white[k % 2], low, high) * decay(t, at_hz(KITCHEN_T60, hz))
        tail += at_ports(mid, side, hz)
    tail *= 1 - np.exp(-t / 0.0027)  # echoes thicken over the first reflections
    tail /= np.sqrt(np.sum(tail ** 2) / 2)
    return signal.fftconvolve(x.mean(axis=0)[None], tail, axes=1)[:, :N]


BUMP_SEND_DB, PING_SEND_DB, BODY_SEND_DB, MOTOR_SEND_DB = -7.5, -17.5, -15.5, -8.0

def scene():
    """Superposition of direct sound, the kitchen's reverberant field and the unreverberated noises."""
    knocks, send = blows()
    hollow, ringing = bumps(), pings()
    body = thuds() + jangle() + hinge_spring() + rattle()
    hum = motor()
    direct = hum + knocks + hollow + ringing + body
    send += from_db(BUMP_SEND_DB) * hollow + from_db(PING_SEND_DB) * ringing
    send += from_db(BODY_SEND_DB) * body + from_db(MOTOR_SEND_DB) * hum
    return direct + kitchen(send) + door_motion() + rubs() + room_noise()


# overall colour of the sound, with two dips in the treble: (frequency [Hz], gain [dB])
SOUND_COLOUR = [(20, -18.5), (45, -2.5), (4800, 0.5), (5250, -4.5), (5900, 3.5), (11000, 1.5),
                (12300, -7.5), (13600, -0.5), (16000, 10)]
# balance of the ports: (frequency [Hz], left minus right level [dB])
PORT_BALANCE = [(60, 0), (180, -2.5), (550, -2.0), (1650, -2), (4970, 0.5), (15000, 0.5)]
# the right port trails in the treble: (frequency [Hz], phase lag [rad])
PORT_LAG = [(60, 0), (300, -.35), (600, -.55), (1000, .2), (2100, 0), (2750, 1.7), (3450, 1.7), (4130, 2.2),
            (5200, 3.14), (6200, 4.4), (7580, 6), (8960, 6.3), (10340, 7.8), (12300, 9.4), (14470, 11.7),
            (16500, 12.5)]
CEILING, CUTOFF_HZ = .95, 16800

def record(dry):
    """Transduction: each port has its own gain and phase; saturation rounds peaks before a low-pass."""
    size = next_fast_len(N)
    hz = np.arange(1, size // 2 + 2) * SR / size
    half_each = np.array([[.5], [-.5]])  # left, right
    balance = from_db(half_each * at_hz(PORT_BALANCE, hz))
    phase_shift = np.exp(1j * half_each * at_hz(PORT_LAG, hz))
    response = from_db(at_hz(SOUND_COLOUR, hz)) * balance * phase_shift
    ports = irfft(rfft(dry, size) * response, size)[:, :N]
    rounded = CEILING * np.tanh(ports / CEILING)
    return signal.sosfilt(signal.cheby2(12, 70, CUTOFF_HZ, fs=SR, output="sos"), rounded)


dry = scene()
out = record(dry)
unload_audio(out)
```